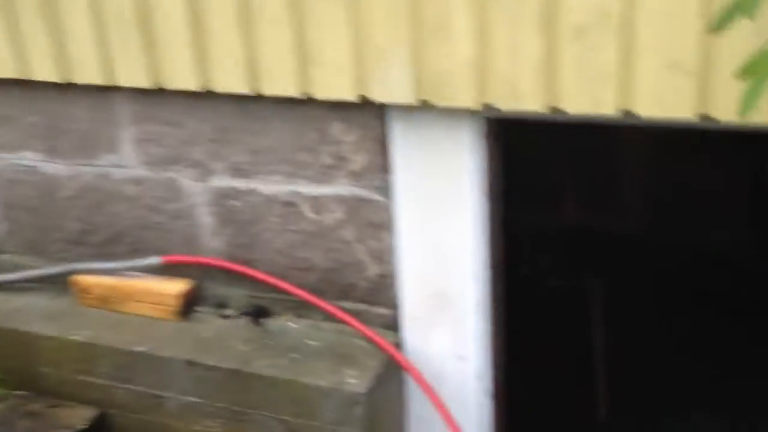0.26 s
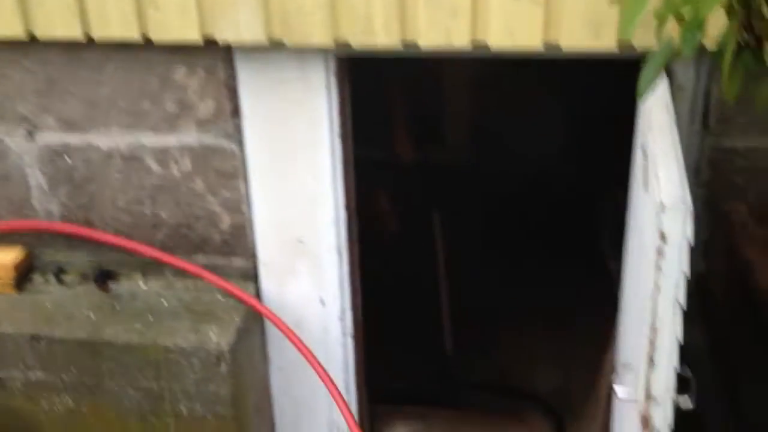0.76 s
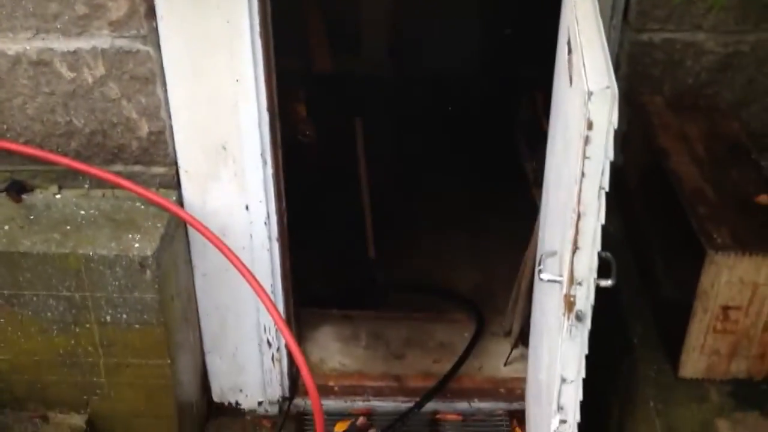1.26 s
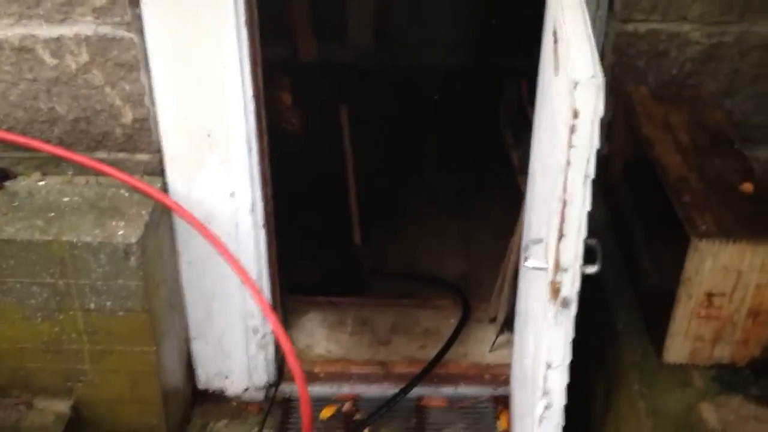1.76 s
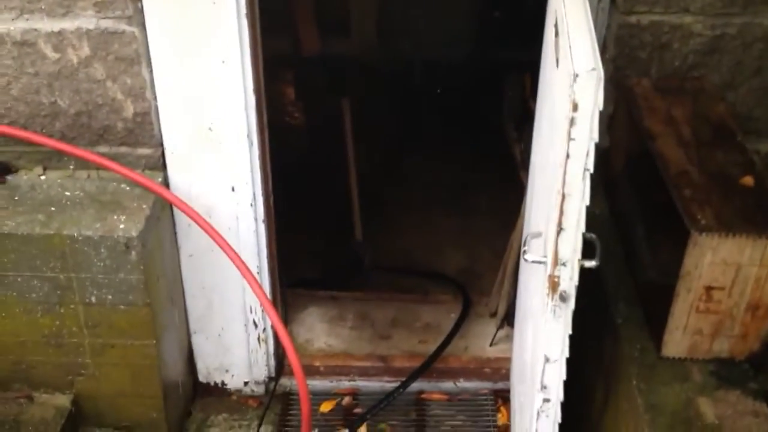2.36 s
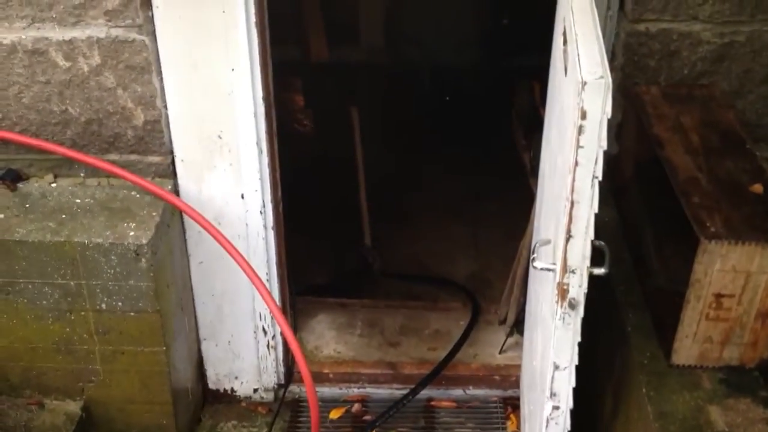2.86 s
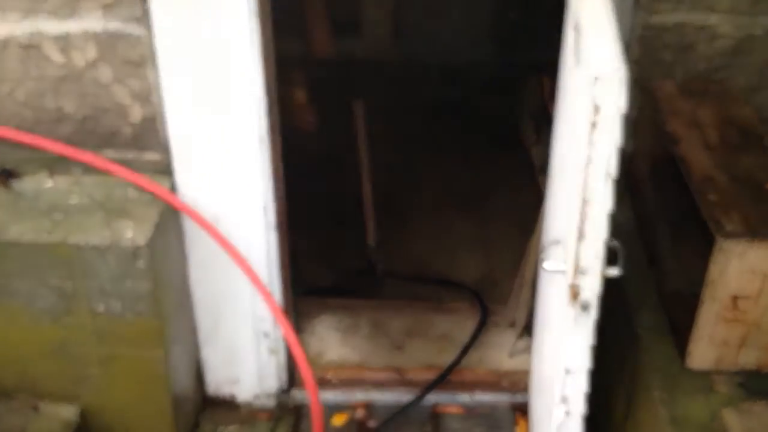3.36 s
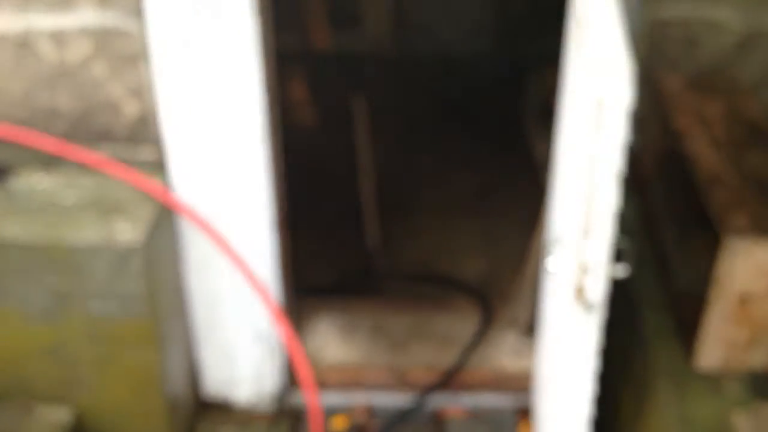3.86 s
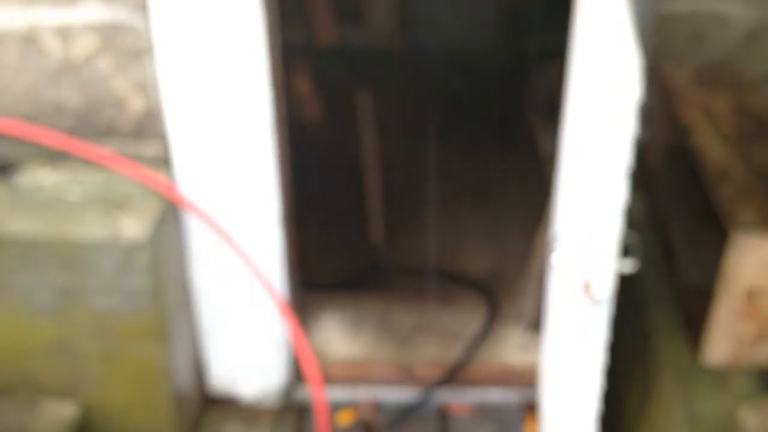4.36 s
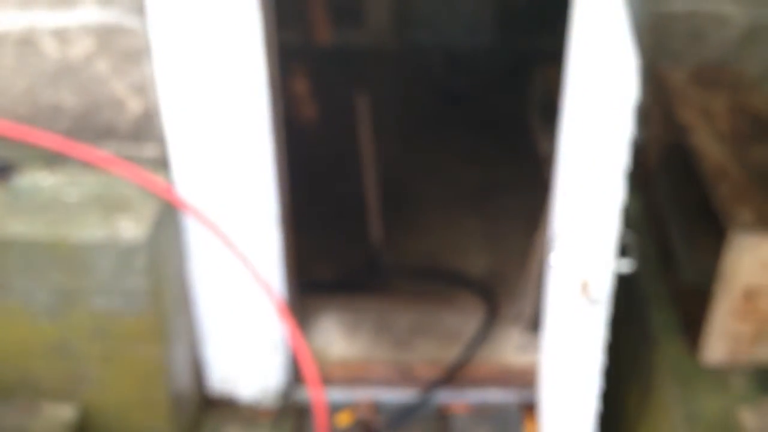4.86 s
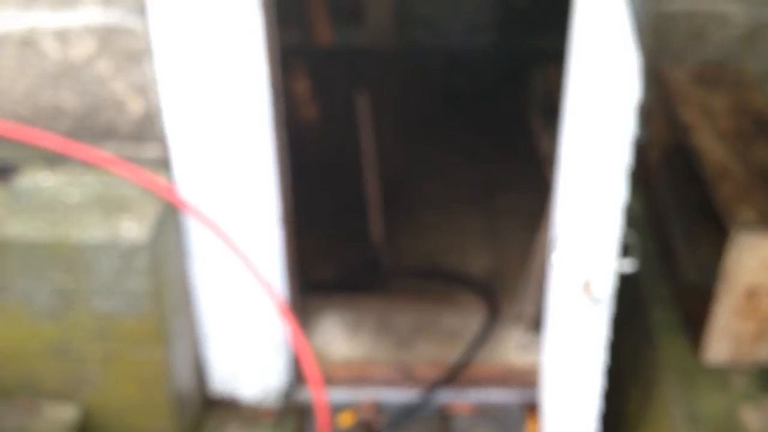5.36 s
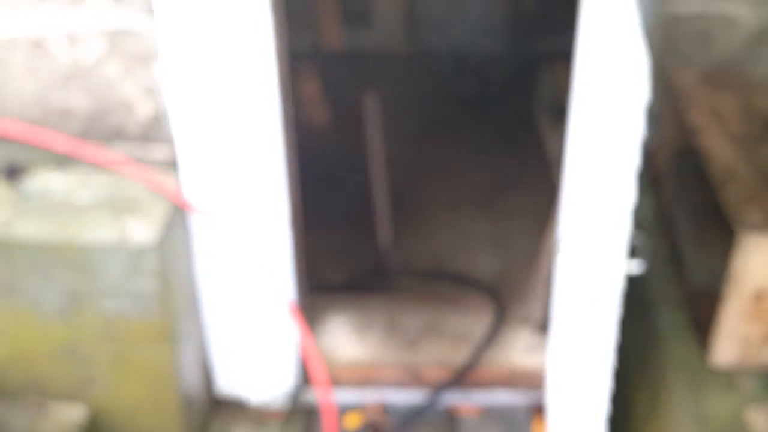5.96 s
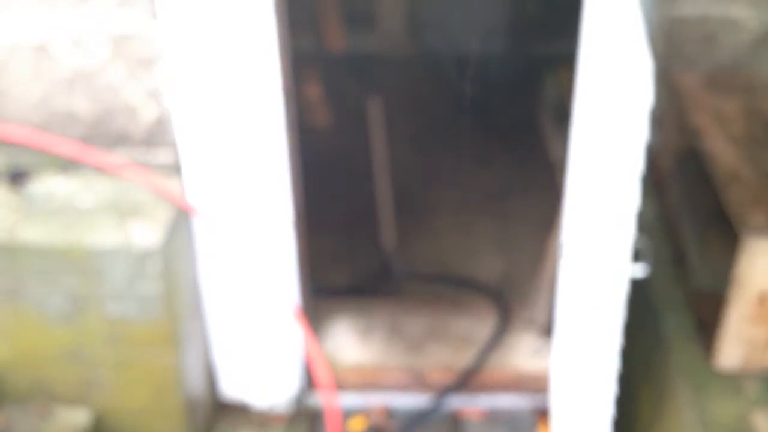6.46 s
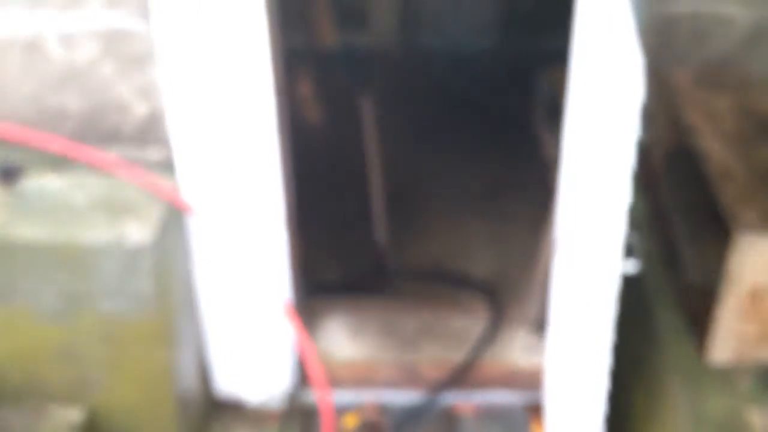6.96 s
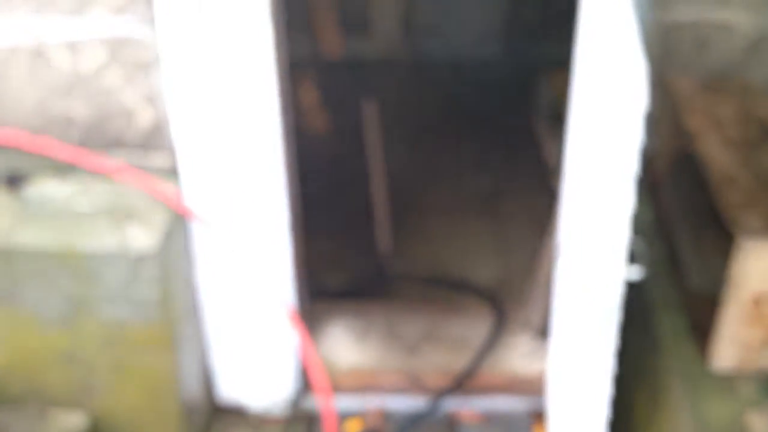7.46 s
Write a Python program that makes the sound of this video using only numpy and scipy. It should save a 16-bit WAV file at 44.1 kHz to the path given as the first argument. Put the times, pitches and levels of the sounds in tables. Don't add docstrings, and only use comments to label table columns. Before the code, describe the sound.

A small electric pump hums and whirs steadily in a flooded stone cellar, water roaring and gurgling while light rain patters outside.

```python
import sys
import numpy as np
from scipy import signal
from scipy.fft import rfft, irfft, next_fast_len
from scipy.io import wavfile
from scipy.ndimage import uniform_filter1d, map_coordinates

SR = 44100
rng = np.random.default_rng(int(sys.argv[2]) if len(sys.argv) > 2 else 0)


def elevation(decibels):
    levels = np.asarray(decibels, float)
    return 10 ** (levels / 20)


def inscribe(sig):
    pcm = np.round(np.clip(np.atleast_2d(sig).T, -1, 1) * 32767)
    wavfile.write(sys.argv[1], SR, pcm.astype(np.int16))


N = 340011

SHAFT_HZ = 47.775
BALL_ORDER = 4.331
SMEAR_HZ = 16
CAGE_DB = -63
# (shaft multiple, level [dB rms], share of eddies, share of water surface, smear level [dB])
VANE_BEATS = [(6, -58, 0, 0, -83), (12, -43, 0.91, 0.059, -66), (18, -47, 0.11, 1.27, -58.5),
              (24, -57, 0, 0.17, -59)]
# (shaft multiple, level [dB rms])
SHAFT_HARMONICS = [(2, -93), (4, -83.5), (7, -85), (8, -100), (10, -84), (11, -59), (13, -60), (14, -79),
                   (17, -65), (19, -59), (22, -61.5), (30, -57.5), (36, -91), (38, -56), (48, -65)]
# (multiple of ball rate, shaft sideband, level [dB rms])
BEARING_LINES = [(1, 0, -75), (16, 0, -74), (17, 0, -67), (18, 0, -60.5), (19, 0, -59.5), (19, 1, -68),
                 (19, -1, -69), (20, 0, -73), (20, 1, -75), (21, -1, -68), (22, 1, -73), (24, -1, -70),
                 (24, 1, -72), (25, -1, -70), (25, 1, -68), (26, -1, -64.5), (27, -1, -71), (27, 1, -76),
                 (28, -1, -77), (28, 1, -75), (34, -1, -77)]
WHINE_SHADING = {17: .7, 18: 2.2, 19: .5}
# (frequency [Hz], level [dB rms])
WINDING_HUM = [(200.1, -73), (1164.9, -62), (1264.6, -62), (3902.7, -64), (3961.7, -71), (7791.7, -76)]
# (frequency [Hz], width [Hz], level [dB])
CAGE_BAND = [(3950, 80, 0)]
# (time [s], level [dB])
CAGE_APPROACH = [
    (0, -8),
    (2.2, -7),
    (3.5, 0),
    (7.71, 1),
]
# (time [s], level [dB])
DOOR_TURN = [
    (0, -20),
    (.34, -19),
    (.42, -5),
    (.95, -3),
    (1.15, 0),
    (7.71, 0),
]
# (time [s], lift [dB], half length [s])
EDDIES = [(0.005, -13, 0.008), (0.08, -17, 0.012), (0.17, -4, 0.16), (0.314, 3, 0.014),
          (0.359, -16, 0.016), (0.389, -6, 0.009), (0.454, -1, 0.007), (0.504, 11.5, 0.0075),
          (0.564, 11.5, 0.011), (0.599, -9, 0.009), (0.654, 8.5, 0.028), (0.703, -7, 0.012),
          (0.763, 7.5, 0.03), (0.828, -16, 0.016), (0.968, 4, 0.009), (1.033, 8.5, 0.014),
          (1.102, -13, 0.009), (1.212, 5, 0.16), (1.237, -4, 0.009), (1.322, -4, 0.01),
          (1.377, 5.5, 0.034), (1.442, -7, 0.022), (1.541, 6.5, 0.05), (1.616, -9, 0.0078),
          (1.641, 4.3, 0.0079), (1.691, -14, 0.016), (1.781, -11, 0.0076), (1.836, 7.5, 0.039),
          (1.896, -19, 0.012), (1.936, 3.5, 0.009), (1.961, -9, 0.0082), (1.995, 5.5, 0.018),
          (2.065, -11, 0.022), (2.15, -3, 0.016), (2.21, 10, 0.0051), (2.295, 6.7, 0.022),
          (2.42, 4, 0.015), (2.469, 8.5, 0.012), (2.514, -13, 0.013), (2.569, 8, 0.0071),
          (2.619, -11, 0.02), (2.684, 4.4, 0.012), (2.779, 7.5, 0.041), (2.829, 8, 0.009),
          (2.863, -3, 0.011), (2.933, 5, 0.008), (3.023, -2, 0.009), (3.053, 5.5, 0.009),
          (3.078, -13, 0.009), (3.163, 3.3, 0.063), (3.238, -12, 0.01), (3.278, 9, 0.012),
          (3.362, 9, 0.0068), (3.382, -18, 0.009), (3.557, -14, 0.0063), (3.627, 8, 0.004),
          (3.702, -11, 0.014), (3.746, 4.6, 0.009), (3.771, -5, 0.009), (3.871, 8.5, 0.023),
          (3.916, -10, 0.0068), (3.956, -2, 0.03), (4, -10, 0.0079), (4.062, 10, 0.018),
                (4.116, -13, 0.016), (4.171, -3.4, 0.009), (4.208, 5, 0.012), (4.233, -20, 0.0098),
                (4.28, 5, 0.038), (4.385, 7, 0.0082), (4.402, -6, 0.009), (4.495, 4, 0.016),
                (4.581, 10, 0.01), (4.609, -22, 0.0095), (4.687, -7, 0.018), (4.835, -10, 0.009),
                (4.87, -3, 0.0082), (4.943, 7, 0.024), (5.113, -17, 0.0062), (5.224, -14, 0.011),
                (5.278, -1.5, 0.18), (5.284, -14, 0.0071), (5.33, -14, 0.009), (5.393, -9, 0.013),
                (5.433, 5, 0.016), (5.517, -11, 0.012), (5.58, 7, 0.0091), (5.605, -10, 0.0082),
                (5.706, -9, 0.03), (5.796, -9, 0.009), (5.834, 10, 0.015), (5.852, -20, 0.0075),
                (5.912, -12, 0.012), (5.973, 4.9, 0.0098), (6.077, -5, 0.009), (6.137, 6.5, 0.032),
                (6.193, -16, 0.015), (6.221, -10, 0.0098), (6.269, 10.5, 0.0068), (6.405, 5.5, 0.087),
                (6.495, -14, 0.0061), (6.509, 10, 0.0063), (6.695, -4.5, 0.07), (6.75, -12, 0.018),
                (6.808, 4.1, 0.013), (6.871, 8.5, 0.011), (6.91, -15, 0.014), (6.965, 8, 0.01),
                (7.013, -3.3, 0.016), (7.064, -10.7, 0.0077), (7.124, 3, 0.015), (7.214, -18, 0.0084),
                (7.277, -11, 0.0081), (7.285, 9, 0.13), (7.322, -20, 0.0077), (7.346, -10, 0.009),
                (7.48, -19, 0.0073), (7.555, -7.5, 0.053), (7.624, 2, 0.01), (7.683, 9, 0.015)]
# (time [s], lift [dB], half length [s])
SURFACE_ROCKING = [(0.14, 5, 0.093), (0.389, -4, 0.08), (0.663, -8, 0.038), (0.788, -8, 0.03),
                   (1.068, -7, 0.018), (1.357, -18, 0.043), (1.571, 2.5, 0.096), (1.846, -3.5, 0.062),
                   (2.095, 2.5, 0.12), (2.434, 3, 0.024), (2.604, 1, 0.03), (3.078, 3.5, 0.11),
                   (3.367, 4.5, 0.019), (3.597, -9, 0.017), (3.692, -13, 0.037), (3.841, 8, 0.05),
                   (3.851, -10, 0.14), (3.976, -21, 0.04), (4.051, 9, 0.03), (4.195, -3, 0.14),
                   (4.689, -18, 0.15), (4.879, 10, 0.03), (4.954, -9, 0.023), (5.078, -1, 0.03),
                   (5.218, -11, 0.025), (5.418, 1.5, 0.08), (5.932, 2, 0.03), (6.086, -7, 0.028),
                   (6.321, -21, 0.059), (6.75, 8.5, 0.029), (6.994, -1.9, 0.1), (7.149, 15.5, 0.028),
                   (7.159, -12, 0.24), (7.308, -10, 0.036), (7.498, 5, 0.055), (7.688, -13, 0.03)]

ROAR_DB, RUSH_DB = -41, -42
RUSH_SHADE = 0.11
GURGLES_PER_S, GURGLE_S = 9, .006
# (frequency [Hz], level [dB per Hz])
CELLAR_SPECTRUM = [(40, -76), (85, -81), (140, -30.5), (380, -33.5), (450, -15), (700, -16.5), (800, -21.5),
                   (1000, -15.5), (1400, -15.5), (1600, -24), (2200, -45.5)]
# (frequency [Hz], width [Hz], level [dB])
CELLAR_MODES = [(100, 27, -34.5), (194, 35, -24.5), (272, 62, -25), (333, 81, -27), (457, 13, -18.5),
                (514.3, 11, -5.5), (531, 36, -11.5), (612, 30, -8), (637, 24, -14.5), (659, 24, -14.5),
                (846, 36, -9), (924, 41, -9.5), (965, 20, -29), (1080, 48, -8), (1129, 42, -5.5),
                (1223, 45, -18.5), (1246, 28, -7.5), (1345, 67, -20), (1435, 34, -24)]
# (frequency [Hz], width [Hz], level [dB])
THROB_BANDS = [(559, 12, -2), (585, 16, -3), (545, 20, -10)]
# (frequency [Hz], level [dB per Hz])
CASING_SPECTRUM = [(1000, -19.5), (1500, -7.5), (2000, -4.5), (2200, -7), (2500, -12.5), (3200, -16),
                   (4000, -14.5), (5400, -16.5), (6200, -34), (9000, -39.5)]
# (frequency [Hz], width [Hz], level [dB])
CASING_MODES = [(1758, 260, 0.5), (1862, 37, 4), (1924, 57, 0), (2045, 55, -1), (2320, 55, -15),
                (2320, 15, -17), (2480, 40, -9), (2684, 43, -9.5), (3780, 330, -15), (4730, 23, -7.5)]
# (frequency
# [Hz], width [Hz], level [dB])
YARD_ECHO = [(2780, 53, 7), (2600, 380, -3), (6550, 800, -8), (1950, 500, 7)]
# (frequency [Hz], pitch spread [share], level [dB])
AIR_POCKETS = [(1116, 0.042, -51), (1880, 0.059, -51.5)]

REBOUND_S, REBOUND_DB = .019, -8
# (time [s], level [dB])
RAIN_LEVEL = [
    (0.0, -55),
    (0.62, -53.5),
    (1.57, -54.5),
    (1.95, -56),
    (2.68, -55),
    (5.82, -54.5),
    (6.4, -54.5),
    (7.71, -54.5),
]
# (frequency [Hz], level [dB per Hz])
PATTER_SPECTRUM = [(1500, -46), (3000, -11), (5500, -0.5), (6400, -1), (7600, 3), (8500, -2.5),
                   (9800, -7.5), (12000, -5.5), (13500, -4.5), (14200, -9), (15300, -10.5)]
# (time [s], peak level [dB], brightness [dB])
NEAR_DROPS = [(0.004, -44, 8), (0.013, -42, 10), (0.46, -43, 4), (0.767, -45, 5), (1.196, -43, 4),
              (1.464, -44, 1), (3.46, -45, 7), (4.547, -41, 2), (5.12, -46, 6), (5.216, -46, 7),
              (5.299, -44, 11), (6.58, -41, 9), (0.3114, -39, 2), (0.5227, -41, 9), (0.675, -40, 3),
              (1.0984, -45, 5), (1.114, -42, 5), (3.6044, -44, 3), (4.0574, -46, 2), (4.8112, -33, 4),
              (4.8245, -42, 6), (4.846, -41, 1), (5.0184, -45, 3), (5.286, -44, 4), (5.37, -42, 3),
              (5.7264, -57, 27), (6.5694, -43, 3), (6.6264, -45, 14), (6.6524, -42, 3), (7.3974, -42, 3),
              (7.4719, -45, 16), (7.6434, -47, 3)]
# (frequency [Hz], level [dB per Hz])
SPLASH_SPECTRUM = [(1500, -25), (2800, 14.5), (6000, 4.5), (10000, -6.5), (15300, -6)]
# (frequency [Hz], level [dB], 60 dB decay [s])
HANDLE_MODES = [(2940, -29.5, .04), (5650, -40, .04), (9400, -41, .02)]

TOP_HZ = 15350
# (time [s], level [dB], frequency [Hz])
BODY_BUMPS = [(1.545, -54, 120), (1.589, -67.5, 80), (1.953, -55, 170), (2.048, -55, 260), (5.72, -74, 50),
              (7.598, -53, 198), (4.0855, -46, 260), (4.0862, -38, 600), (4.0866, -28, 1050),
              (4.0868, -35, 2000), (4.0868, -39, 3100)]
# (time [s], share [0-1])
BREAKUP = [
    (0, 1),
    (1.8, 1),
    (2.0, .1),
    (3.9, .1),
    (4.1, 1),
    (7.71, .8),
]
# (frequency [Hz], chance [0-1])
TREBLE_GAPS = [(3000, .004), (6000, .04), (7500, .015), (9500, .13), (11500, .06), (13500, .16),
               (15000, .38)]


def unit(x):
    return x / np.sqrt(np.mean(x ** 2) + 1e-20)


def along(points, hz):
    f, v = np.transpose(points)
    return np.interp(np.log(hz + 1), np.log(f + 1), v, left=-120)


def curves(rows):
    s, *cols = np.transpose(rows)
    return [np.interp(np.arange(N) / SR, s, c) for c in cols]


def swells(rows):
    t = np.arange(0, N, 32) / SR
    level_db = sum(db * np.exp(-.5 * ((t - s) / half_s) ** 2) for s, db, half_s in rows)
    return np.interp(np.arange(N) / SR, t, level_db)


def wobble(rate):
    knots = rng.standard_normal(400)
    return map_coordinates(knots, [np.clip(np.arange(N) * rate / SR, 0, 399)])


def smooth_field(shape, size):
    rows = uniform_filter1d(rng.standard_normal(shape), size=size, axis=0)
    return uniform_filter1d(rows, size=size, axis=1)


def patchy(depth_db):
    z = signal.stft(rng.standard_normal(N), nperseg=512)[2]
    gain = elevation(depth_db * unit(smooth_field(z.shape, 8)))
    return signal.istft(z * gain, nperseg=512)[1][:N]


def coloured(x, base, modes=()):
    m = next_fast_len(N + 8192)
    f = np.fft.rfftfreq(m, 1 / SR)
    power = elevation(2 * along(base, f))
    for hz, width, db in modes:
        power = power + elevation(2 * db) / (1 + (2 * (f - hz) / width) ** 2) ** 2
    return unit(irfft(rfft(x, m) * np.sqrt(power), m)[:N])


def resonant_noise(modes):
    return coloured(rng.standard_normal(N), [(20, -120), (SR, -120)], modes)


def tone(phase, flutter_db, slip, pace=5):
    start = 2 * np.pi * rng.random()
    return np.sqrt(2) * elevation(flutter_db * wobble(7)) * np.sin(phase + start + slip * wobble(pace))


def vane_beats(angle, eddy_db):
    surface_db = swells(SURFACE_ROCKING)
    out = 0
    for k, db, eddy, surface, smear_db in VANE_BEATS:
        phase = k * angle
        steady = tone(phase + 0.3 * wobble(9), flutter_db=-0.2, slip=0.87, pace=1.787)
        smear = wobble(SMEAR_HZ) * np.sin(phase) + wobble(SMEAR_HZ) * np.cos(phase)
        beat = elevation(db + 0.41 * wobble(18)) * steady + elevation(smear_db) * smear
        out = out + elevation(eddy * eddy_db + surface * surface_db) * beat
    return out


def bearing_whine(angle, door_db):
    out = 0
    for k, side, db in BEARING_LINES:
        line = tone((k * BALL_ORDER + side) * angle, flutter_db=.9, slip=.3, pace=4)
        level_db = db - .4 + .8 * wobble(22) + WHINE_SHADING.get(k, 1) * door_db
        out = out + elevation(level_db) * line
    return out


def motor(eddy_db):
    t = np.arange(N) / SR
    angle = 2 * np.pi * SHAFT_HZ * t + 0.014 * wobble(2.5) + 0.003 * wobble(16)
    door_db = curves(DOOR_TURN)[0]
    beats = vane_beats(angle, eddy_db)
    shaft = sum(elevation(db) * tone(k * angle, flutter_db=4.0, slip=0.59) for k, db in SHAFT_HARMONICS)
    whine = bearing_whine(angle, door_db)
    hum = sum(elevation(db) * tone(2 * np.pi * hz * t, flutter_db=1.5, slip=0.15) for hz, db in WINDING_HUM)
    cage = elevation(CAGE_DB + curves(CAGE_APPROACH)[0]) * resonant_noise(CAGE_BAND)
    return beats + shaft + whine + elevation(door_db) * (hum + cage)


def casing_rush(door_db):
    vane = 1 + 0.061 * np.cos(2 * np.pi * 6 * SHAFT_HZ * np.arange(N) / SR)
    level_db = RUSH_DB + RUSH_SHADE * door_db + 0.38 * wobble(2.98) + 0.18 * wobble(25)
    rush = elevation(level_db) * coloured(vane * patchy(depth_db=1.0), CASING_SPECTRUM, CASING_MODES)
    treble = signal.sosfilt(signal.butter(4, 3200, "high", fs=SR, output="sos"), rush)
    return rush - (1 - elevation(.28 * door_db)) * treble


def water(eddy_db):
    door_db = curves(DOOR_TURN)[0]
    roar_db = ROAR_DB + 0.46 * wobble(1.405)
    roar = elevation(roar_db) * coloured(patchy(depth_db=1.06), CELLAR_SPECTRUM, CELLAR_MODES)
    throb = elevation(0.45 * eddy_db - 47.5) * resonant_noise(THROB_BANDS)
    facing_away = np.clip(-door_db / 18, 0, 1)
    yard = elevation(-44) * facing_away * resonant_noise(YARD_ECHO)
    return roar + throb + casing_rush(door_db) + yard


def gurgles():
    out, t = np.zeros(N + SR), np.arange(SR // 20) / SR
    u = t / GURGLE_S
    for hz, spread, db in AIR_POCKETS:
        for when, size, pitch in rng.random((round(GURGLES_PER_S * N / SR), 3)):
            start_hz = hz * (1 + spread * (2 * pitch - 1))
            phase = 2 * np.pi * start_hz * t * (1 + 0.0119 * u)
            out[int(when * N):][:len(t)] += elevation(db + 10.3 * size) * np.e * u * np.exp(-u) * np.sin(phase)
    return out[:N]


def patter():
    sizes = elevation(3.0 * np.minimum(rng.exponential(size=N), 3.5))
    hits = (rng.random(N) < 900 / SR) * rng.standard_normal(N) * sizes
    impact = elevation(-60 * abs(np.arange(128) - 40) / SR / 0.0014) * rng.standard_normal(128)
    grains = signal.fftconvolve(hits, impact)[:N]
    mix = patchy(depth_db=0.5) * np.sqrt(2) + 0.49 * unit(grains)
    gusts_db = 0.42 * wobble(4.5) + 0.4 * wobble(9) + 0.47 * wobble(20)
    return elevation(curves(RAIN_LEVEL)[0] + 2.0 + gusts_db) * coloured(mix, PATTER_SPECTRUM)


def drops():
    out, t = np.zeros(N + SR), np.arange(SR // 10) / SR
    splash = coloured(rng.standard_normal(N), SPLASH_SPECTRUM)
    decay = elevation(-60 * t / .022) + .3 * elevation(-60 * t / .11)
    for s, db, bright_db in NEAR_DROPS:
        spray = splash[rng.integers(N - SR):][:len(t) + 1]
        snap = (spray[1:] + elevation(bright_db) * np.diff(spray)) * decay
        out[round(s * SR):][:len(t)] += elevation(db - 7) * snap * (1 - np.exp(-t / .0005))
    largest_s = max(NEAR_DROPS, key=lambda drop: drop[1])[0]
    ring = sum(elevation(db - 60 * t / t60) * np.sin(2 * np.pi * hz * t) for hz, db, t60 in HANDLE_MODES)
    for late_s, db in ((0, 0), (REBOUND_S, REBOUND_DB)):
        out[round((largest_s + late_s) * SR):][:len(t)] += elevation(db) * ring * (1 - np.exp(-t / .0006))
    return out[:N]


def handling():
    out, t = np.zeros(N + SR), np.arange(SR // 5) / SR
    for s, db, hz in BODY_BUMPS:
        u = t * hz / 0.63
        push = elevation(db) * np.e * u * np.exp(-u) * np.sin(2 * np.pi * hz * t)
        shell = signal.butter(2, hz / 2, "high", fs=SR, output="sos")
        out[round(s * SR):][:len(t)] += signal.sosfilt(shell, push)
    return out[:N]


def scene():
    eddy_db = swells(EDDIES)
    gusts = elevation(0.36 * wobble(4.6) + 0.22 * wobble(13))
    airborne = water(eddy_db) + gurgles() + patter() + drops()
    return (motor(eddy_db) + gusts * airborne + handling())[None]


def break_up(x):
    hz, t, z = signal.stft(x, SR, nperseg=2048, noverlap=1536)
    field = smooth_field(z.shape[1:], 5)
    rank = np.argsort(np.argsort(field, axis=None)).reshape(field.shape) / field.size
    chance = along(TREBLE_GAPS, hz)[:, None] * np.interp(t, *np.transpose(BREAKUP))
    return signal.istft(z * (rank > chance), SR, nperseg=2048, noverlap=1536)[1][:, :N]


def low_pass(x):
    return signal.sosfilt(signal.butter(12, 15400, fs=SR, output="sos"), x)


def record(dry):
    hz = np.fft.rfftfreq(N, 1 / SR)
    bass = (hz / 75) ** 2 / np.sqrt(1 + (hz / 75) ** 4)
    mix = irfft(rfft(break_up(dry)) * bass * (hz < TOP_HZ), N)
    return low_pass(mix)


dry = scene()
out = record(dry)
inscribe(out)
```